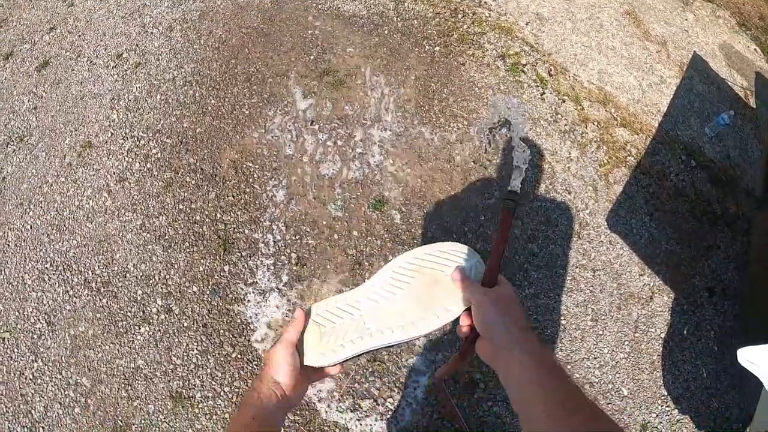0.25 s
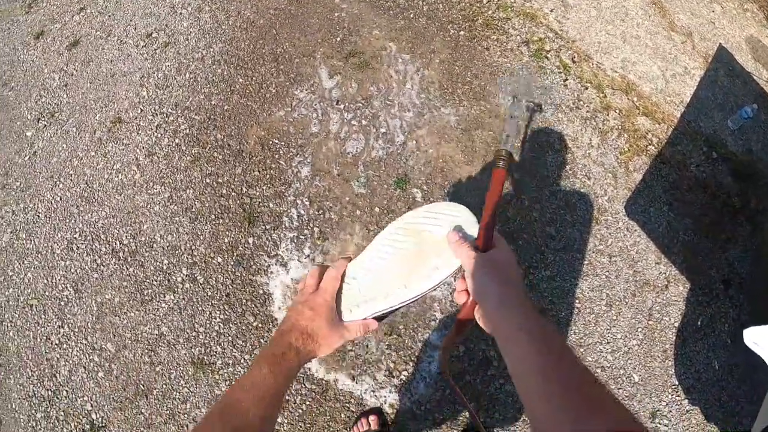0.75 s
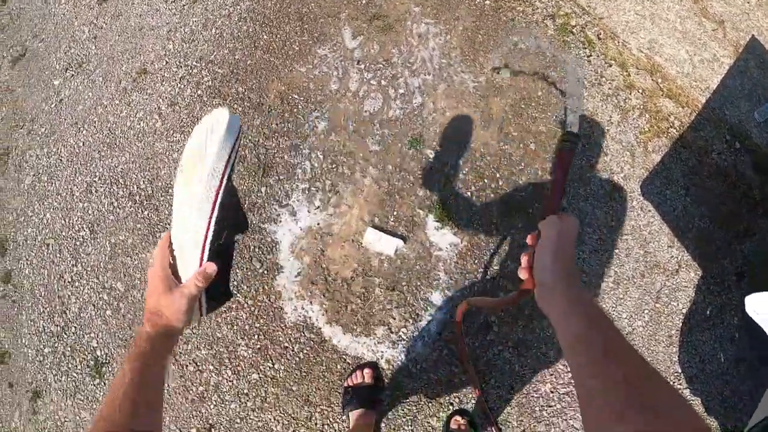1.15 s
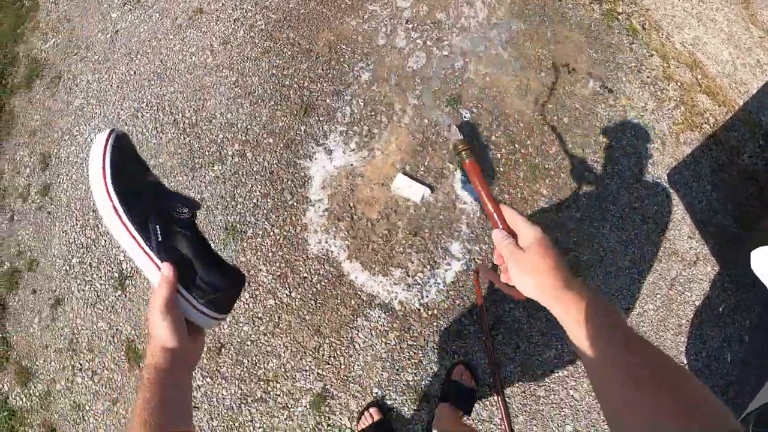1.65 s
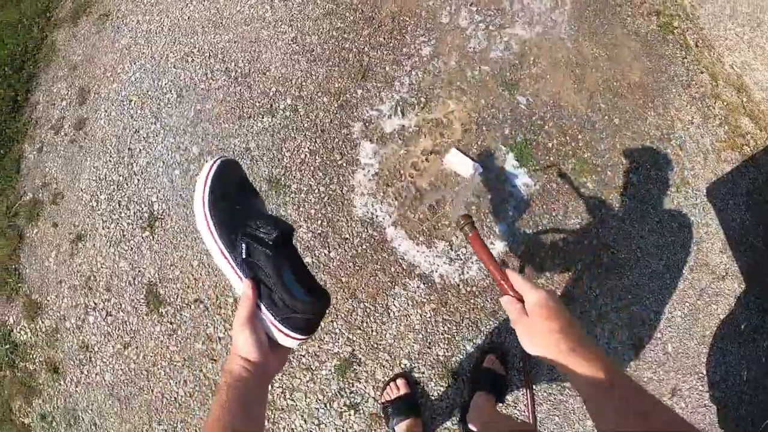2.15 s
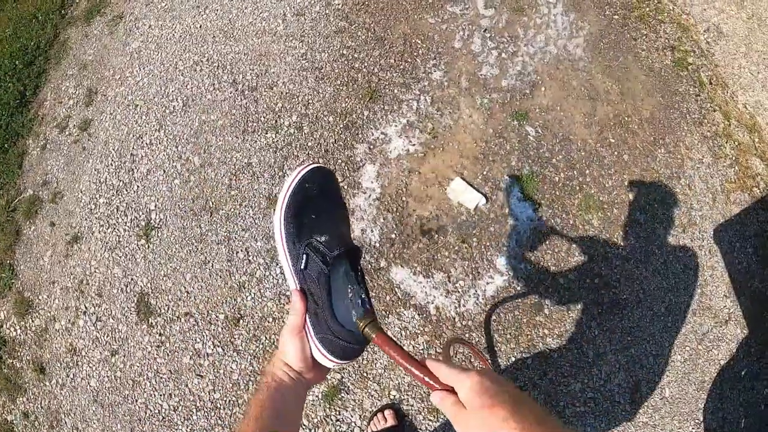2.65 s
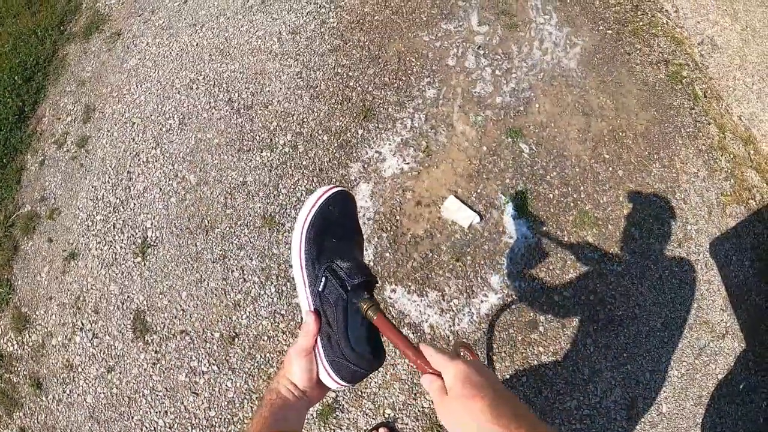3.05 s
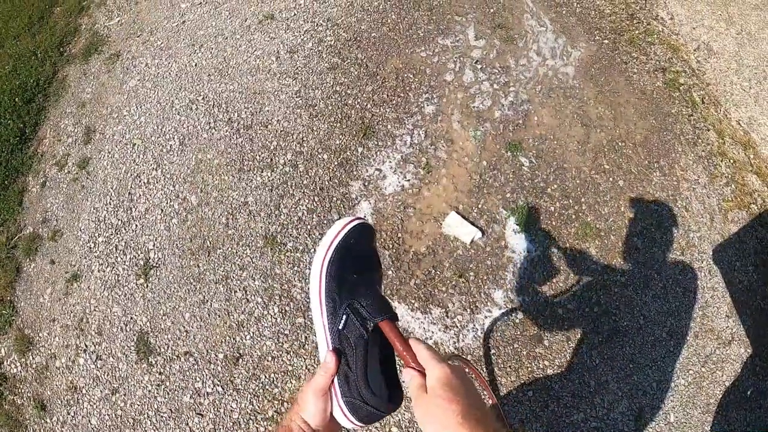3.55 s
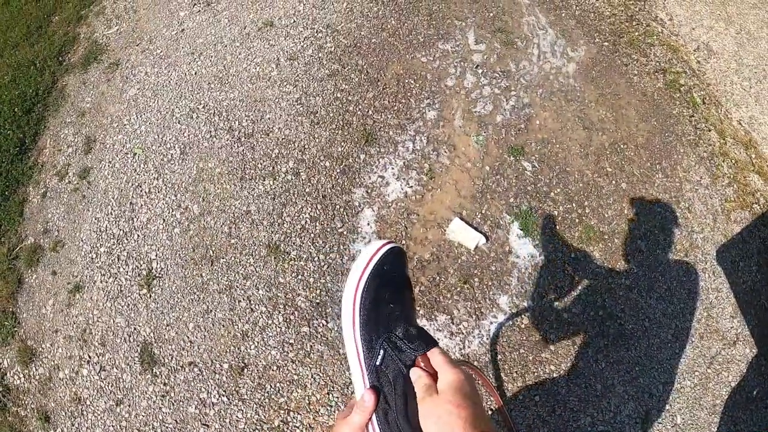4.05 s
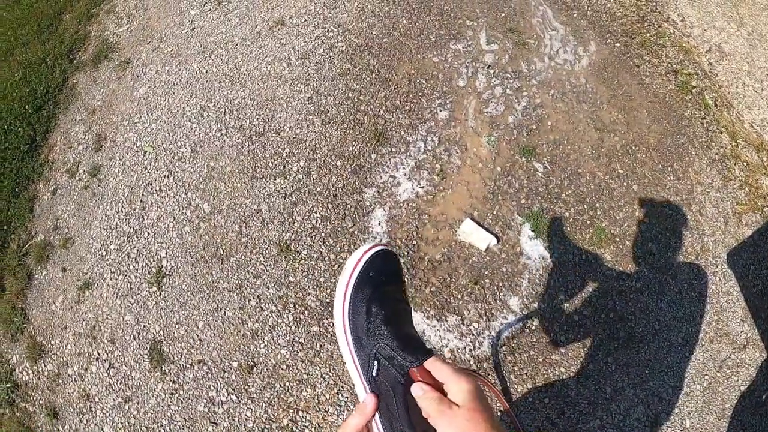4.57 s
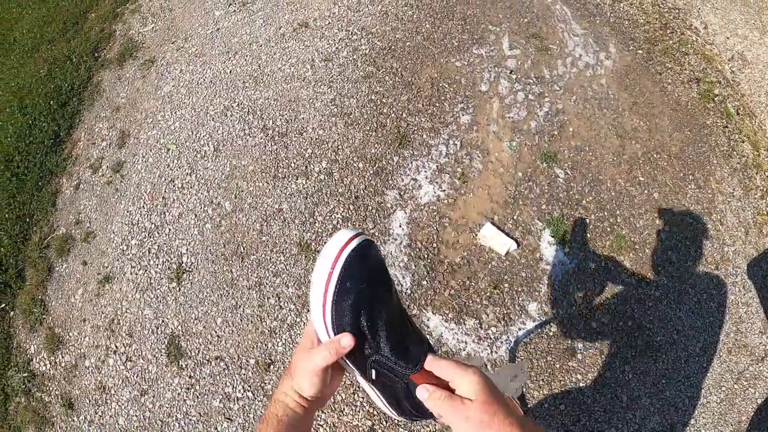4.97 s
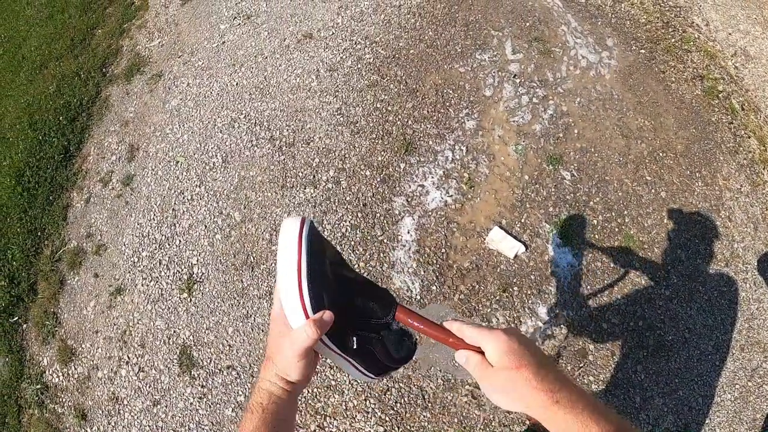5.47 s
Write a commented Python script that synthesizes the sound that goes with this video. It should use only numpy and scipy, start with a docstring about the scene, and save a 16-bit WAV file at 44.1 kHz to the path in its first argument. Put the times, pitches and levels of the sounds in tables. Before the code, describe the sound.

Water from a garden hose splatters unevenly on wet gravel, with sharp little slaps and fizzing drops. About halfway through, the stream goes into a canvas shoe and softens into a muffled, hollow gurgle with bubbles and froth. Near the end it spills out and splashes on the stones again. Wind buffets the close outdoor microphone, over a low hum and faint hiss.

```python
"""Garden hose on gravel and into a shoe

Outdoors, close to the water, on a stereo microphone with two ports. The broken stream splatters on
gravel, is turned into a canvas shoe, where bubbles ring the hollow in a muffled gurgle, and spills
out again. Wind buffets each port. A breathy whistle comes and goes; a low hum and a faint outdoor
hiss lie beneath."""
import sys
import numpy as np
from scipy import signal
from scipy.fft import rfft, irfft, next_fast_len
from scipy.io import wavfile
from scipy.ndimage import map_coordinates

SR = 44100
rng = np.random.default_rng(int(sys.argv[2]) if len(sys.argv) > 2 else 0)


def generate_wav(signal):
    """Clip the signal to [-1, 1] and save it as 16-bit WAV at the path in sys.argv[1]."""
    frames = np.transpose(np.atleast_2d(signal))
    scaled = np.clip(frames, -1, 1) * 32767
    pcm = np.round(scaled).astype(np.int16)
    wavfile.write(sys.argv[1], SR, pcm)


N = 251811

# deep and middle modes of the water-filled hollow: pitch_hz, width_hz, gain_db
DEEP_MODES = [(403, 190, -1), (591, 130, 2)]
MIDDLE_MODES = [(1105, 136, -2), (1303, 560, 2.7), (1680, 260, -3.5)]


def stream():
    """How hard the stream lands: level curves in dB of large drops, middling drops and fine spray."""
    # splatter on the gravel: time_s, middling_db, fine_db
    flow = [(0.0, -37.5, -46), (0.2, -33.5, -41.5), (0.46, -39, -51), (0.89, -37.5, -46.5),
            (1.27, -40, -52.5), (1.55, -39.5, -51), (1.7, -45.5, -51.5), (1.83, -39, -52.5),
            (1.92, -47.5, -55), (2.0, -36.5, -51), (2.16, -42, -47), (2.5, -45, -55), (2.56, -53, -60),
            (2.86, -53.5, -56), (2.97, -56, -60), (3.12, -55, -61), (3.17, -62, -73), (3.25, -42, -49),
            (3.32, -53, -64.5), (3.66, -61, -62.5), (3.95, -58.5, -64.5), (4.1, -61, -90), (4.34, -71, -71),
            (4.5, -56, -62), (4.66, -59, -61), (4.68, -47.5, -49), (4.85, -51.5, -54), (4.875, -57, -68),
            (4.9, -50.5, -50.5), (5.08, -45, -55), (5.12, -55, -64), (5.24, -48, -63), (5.27, -40, -51.5),
            (5.36, -38, -54), (5.45, -31.5, -44.5), (5.71, -43.5, -53.5)]
    middling_db, fine_db = curves(flow)
    return middling_db - 7, middling_db, fine_db


def clumps(decay_s=0.0025):
    """How thickly water lands: a steady share plus sudden, dying bursts."""
    decay = np.exp(-np.arange(0, 8 * decay_s, 1 / SR) / decay_s)
    return 1 + unit_rms(signal.oaconvolve(clicks(per_s=200, spread_db=3.4), decay)[:N])


def splatter():
    """The broken stream lands on the gravel in clumps of fizz and tiny ringing drops."""
    # spectrum of the spray: frequency_hz, density_db
    spectrum = [(500, -54), (850, -73), (1170, 5.5), (1650, 11), (2570, 13), (4250, -3), (4860, -1.5),
                (5770, -4.5), (6290, -10.5), (8980, -10.5), (12500, -26.5), (14700, -30), (16000, -55)]
    stream_db, thickness = stream(), clumps()
    # each band also has clumps of its own: small clumps fill only part of the range
    fizz = sum(band(rng.standard_normal(N) * (6 * thickness + clumps()), lo_hz, hi_hz)
               for lo_hz, hi_hz in [(700, 2200), (2200, 4200), (4200, 7500), (7500, 19000)])
    rings = [plink(hz, rng.uniform(2.4, 4.4), 0.043, 0.13) for hz in np.geomspace(950, 13000, 15)]
    drops = sum(signal.oaconvolve(clicks(40 * thickness, 4.8), ring / np.linalg.norm(ring))[:N]
                for ring in rings)
    drops = shaped(drops, np.sqrt)  # equal energy per octave becomes flat per Hz
    water = shaped(unit_rms(fizz) + 0.55 * unit_rms(drops), lambda hz: amp(db_at(spectrum, hz)))
    fine = shaped(water, lambda hz: 1 / (1 + (7000 / (hz + 1)) ** 6))
    large = shaped(water, lambda hz: 1 / (1 + (hz / 3500) ** 8))
    middling = water - large - fine
    surge = amp(1.5 * drift(13)[0])  # the flow pulses a little
    return surge * sum(amp(db) * unit_rms(x) for db, x in zip(stream_db, (large, middling, fine)))


def small_slugs(count=16, lo_hz=1470, hi_hz=4900):
    """Lesser slugs of water land at random, as loud as the splatter allows; rows for splats()."""
    when, size, pitch, crack, side = rng.random((count, 5)).T
    start_s = (np.arange(count) + when) / count * (N - 1) / SR
    level_db = stream()[1][(start_s * SR).astype(int)] + 12 + 17 * size ** 2
    ring_hz = lo_hz * (hi_hz / lo_hz) ** pitch
    return np.transpose([start_s, level_db, ring_hz, -30 + 18 * crack, 9 * (side - 0.5)])


def splats(slap_s=0.0012, lead_s=0.005, rebound_s=0.0033):
    """Slugs of water slap wet stones: a crack, two ringing air pockets, a rebound, fizz and a thud."""
    # the loudest slugs: start_s, level_db, ring_hz, crack_db, leftward_pan
    loud_slugs = [(0.1025, -25, 3570, -23, -5), (0.176, -14.5, 2770, -29, -3), (0.2433, -14, 3070, -3, 12),
                  (0.3511, -21, 3360, -17, 0), (0.4191, -2.5, 2140, -38, -0.5), (0.461, -12, 3120, -28, 0),
                  (0.5152, -1.5, 4140, -48, 2), (0.4835, -12, 4500, -15, 0), (0.557, -20, 2900, -25, 0),
                  (0.589, -19, 3200, -20, 0), (0.568, -22, 1360, -22, 4), (0.616, -6, 5250, -18, 7),
                  (0.6685, -15, 3530, -26, -2), (0.7285, -9.5, 3630, -32, -3), (0.741, -10.5, 2300, -11, 3),
                  (0.7589, -10.5, 2390, 2, -1), (0.8123, -5.5, 2720, -43, 2), (0.804, -17, 3300, -12, -2),
                  (0.841, -13.5, 2500, -18, 0), (0.8824, -18, 2000, -11, -2), (0.9076, -13, 4100, -28, -4),
                  (0.9383, -3.5, 2200, -41, 6), (0.9687, -19, 2250, -18, 0), (0.9876, -11, 4840, -17, 2),
                  (1.0001, -14, 2670, -13, 2), (1.0264, -8.5, 2700, -26, 2), (1.078, -21, 1600, -21, 5),
                  (1.1164, -18, 4400, -18, -1), (1.1293, -12, 4200, -25, -1), (1.1597, -12, 2230, -27, -1),
                  (1.1552, -5, 2140, -41, 2), (1.1995, -17, 2230, -27, 3), (1.2263, -4.5, 2170, -42, 0),
                  (1.2631, -5.5, 1840, -11, 0.5), (1.2953, -18, 1550, -31, -1), (1.3269, -10, 2780, -31, 1),
                  (1.3598, -11, 4730, -25, -2), (1.3794, -18.5, 1270, -18, 6), (1.3917, -12, 2340, -39, -3),
                  (1.4576, -19, 1300, -29, 3), (1.4854, -15, 2400, -23, 1), (1.5374, -13.5, 2400, -33, -3),
                  (1.6078, -19.5, 2470, -29, -7), (1.655, -13, 2620, -11, -3), (1.6813, -14, 1790, -31, 4),
                  (1.7273, -12, 3960, -27, -5), (1.8238, -17, 4360, -32, -12), (1.8814, -6, 1510, -48, -2),
                  (1.9728, -8, 3300, -23, -3), (1.868, -11, 1930, -12, 0), (1.9979, -19, 1410, -22, 9),
                  (2.009, -22, 1330, -20, 0), (2.0246, -8.5, 2190, -8, 4), (2.0842, -12.5, 3940, -15, 0),
                  (2.1093, -16, 2240, -22, 0), (2.1495, -8, 2980, -15, 2), (2.1714, -11.5, 2870, 6, 10),
                  (2.1842, -3.5, 3880, -10, -1), (2.2413, -10, 4100, -37, 0), (2.2681, -10.5, 2900, -5, -2),
                  (2.3532, -12, 1750, 13, 7), (2.4089, -16, 1680, 6, 4), (2.4671, -11.5, 2820, -24, -3.5),
                  (2.5012, -21, 3600, 3, 3), (2.5338, -10, 3250, -4.5, 4), (2.538, -5.5, 4560, -19, 3),
                  (2.5494, -35, 4500, -3, 3), (2.5845, -14.5, 1860, 12, -5), (2.6435, -13, 2740, -25, 2),
                  (2.6644, -26, 5500, -5, 5), (2.7137, -8.5, 3330, -38, 4), (2.7432, -19, 5060, -17, 6),
                  (2.7975, -21.5, 6000, -3, 0), (2.7576, -11, 2800, -5.5, 2), (2.8206, -24, 1160, 2, 1),
                  (2.8425, -18, 2750, -4, 3), (2.879, -24, 2730, -2, 1), (2.9091, -5.5, 3150, 3, 0),
                  (2.9791, -14, 1160, 7, -2), (3.0864, -21.5, 2900, -2, 5), (3.136, -9, 5550, -5, -1),
                  (3.1405, -13, 1150, -3, 0), (3.2406, -22, 2940, -8, -1), (3.4228, -14, 2940, -3, 4),
                  (3.4365, -19, 5500, -5, -1), (3.569, -24, 3220, 3, 8), (3.6132, -28, 2500, -21, 3),
                  (3.6666, -21, 2880, -15, -1), (3.714, -24, 1770, -13, 2), (4.0307, -19.5, 1370, -30, 2),
                  (4.2094, -33, 5920, 6, -4), (4.361, -17, 1730, -49, 4), (4.4675, -17, 4860, -20, -1),
                  (4.5292, -20, 1290, 15, -3), (4.6064, -22.5, 4470, 3, 1), (4.6881, -17.5, 1300, 7, -3),
                  (4.7077, -17, 2880, -15, -1), (4.7442, -13, 3570, -22, -1), (4.7676, -25, 5300, -3, -1),
                  (4.793, -18.5, 5160, -37, 2), (4.805, -12, 5050, -17, 2), (4.8194, -29, 5300, -3, -1),
                  (4.8537, -17, 3750, -24, -1), (4.8971, -12, 3120, -20, -2), (4.9222, -21, 3290, 2, -1),
                  (4.936, -20, 3100, -4, -1), (4.9568, -5, 3200, -25, 1), (4.975, -14, 2830, -21, -2),
                  (4.9801, -15, 3040, 2, 1), (5.0155, -17, 2900, -13, -1), (5.061, -22, 5300, -15, 2),
                  (5.0694, -13, 2750, -28, -1), (5.0918, -21, 5240, -7, 6), (5.2765, -13.5, 1280, -23, -3),
                  (5.3458, -9.5, 3120, -42, 0), (5.3851, -24, 2880, -28, 5), (5.4245, -14, 1090, -32, 0),
                  (5.4405, -12.5, 1720, -17, -3), (5.455, -6.5, 2940, -34, -3),
                  (5.4899, -8.5, 2800, -11, -6), (5.5621, -8.5, 2460, -37, -5), (5.578, -4, 2940, -34, 5),
                  (5.6192, -13, 2600, -30, -1), (5.653, -7, 2400, -33, 4), (5.694, -4.5, 2300, -4, -1)]
    slugs = np.vstack([loud_slugs, small_slugs()])
    out, t = np.zeros((2, N)), np.arange(2000) / SR
    noise, chances = rng.standard_normal((len(slugs), len(t))), rng.random((len(slugs), 2))
    thud = sum(amp(db) * np.sin(2 * np.pi * hz * t) * np.exp(-np.pi * width_hz * t)
               for hz, width_hz, db in DEEP_MODES + MIDDLE_MODES)
    leads = band(noise[:, ::-1] * (t < lead_s) * t / lead_s, 1850, 5500)
    bursts = noise * np.exp(-t / slap_s)
    cracks = band(band(bursts, 2530, 8400), 1060, 11700) + 0.85 * band(bursts, 5280, 5500)
    fizzes = band(noise * np.exp(-t / 0.059), 1600, 8000)
    for i, (start_s, db, hz, crack_db, pan) in enumerate(slugs):
        wait, pitch = chances[i]
        slap = 1.26 * band(bursts[i], 1.04 * hz, 1.06 * hz) + 0.59 * band(bursts[i], 0.48 * hz, 1.5 * hz)
        slap += amp(crack_db + 6) * cracks[i]
        add(slap, 0, 0.77 * plink(hz, 1.44, 0.0027, 0.24))
        add(slap, 0.00058 + 0.001245 * wait, 0.3 * plink(hz * (0.53 + 0.16 * pitch), 1.28, 0.05, 0.22))
        add(slap, rebound_s * (1 + pitch), amp(-13) * slap)  # thrown-up water falls back
        slap = band(slap, 780, 10500)  # the stones radiate little bass
        thud_db = -25 - 10.5 * np.log2(hz / 2000)  # lower, heavier slugs thud more in the hollow
        splat = slap / abs(slap).max() + amp(-32) * fizzes[i] + amp(thud_db) * thud
        gain = amp(db - 6) * amp([[0.13 * pan], [-0.6 * pan]])
        add(out, start_s + 0.0015, gain * splat)
        add(out, start_s + 0.001508 - lead_s, gain * amp(-13) * leads[i])  # the first drops run ahead
    return out


def churn(modes, bubble_gain):
    """Churning water and small bubbles excite the hollow's modes, which wander as the water moves."""
    turbulence = rng.standard_normal(N) * amp(4.3 * np.tanh(drift(25)[0]))
    wander = 1 + 0.052 * drift(7.9)[0]
    slosh = sum(amp(db) * unit_rms(resonate(turbulence, hz * wander, width_hz))
                for hz, width_hz, db in modes)
    bubbles = sum(amp(db) * signal.oaconvolve(clicks(25, 1.34), plink(hz * ratio, 3.65, 0.0022, 0.13))[:N]
                  for hz, _, db in modes for ratio in rng.uniform(0.86, 1.217, 3))
    return unit_rms(unit_rms(slosh) + bubble_gain * unit_rms(bubbles))


def gurgle():
    """Water sloshes in the hollow of shoe and puddle."""
    # strength of the sloshing: time_s, deep_db, middle_db
    levels = [(0.0, -60, -55), (0.32, -54.5, -46), (0.57, -62, -55), (0.78, -59, -47.5), (1.02, -53, -49.5),
              (1.16, -66, -46.5), (1.61, -60, -53.5), (1.88, -61, -47), (2.02, -58, -46), (2.18, -53, -51),
              (2.51, -60, -54), (2.83, -62, -59), (3.07, -53.5, -56.5), (3.34, -55.5, -49.5),
              (3.55, -56, -47), (3.75, -81, -56.5), (3.96, -46.5, -42.5), (4.13, -52, -56),
              (4.36, -57.5, -47), (4.6, -55, -54.5), (4.8, -54.5, -47), (4.93, -65, -51.5),
              (5.02, -50, -42.5), (5.1, -52, -48.5), (5.2, -49.5, -42.5), (5.34, -49.5, -43),
              (5.71, -57.5, -42.5)]
    deep_db, middle_db = curves(levels)
    return amp(deep_db) * churn(DEEP_MODES, 3.3) + amp(middle_db) * churn(MIDDLE_MODES, 1.28)


def froth():
    """Froth comes and goes on the water in the shoe and rings the high modes."""
    # strength of the froth: time_s, level_db
    levels = [(2.95, -72), (3.05, -68), (3.12, -47), (3.19, -61), (3.25, -50), (3.3, -57), (3.4, -46),
              (3.5, -55), (3.58, -51), (3.64, -66), (3.68, -49), (3.76, -65), (3.95, -47), (4.07, -52),
              (4.15, -79), (4.3, -54.5), (4.66, -64), (4.685, -44), (4.77, -46), (4.84, -48), (4.875, -62),
              (4.9, -45), (5.0, -46), (5.09, -48), (5.12, -54), (5.25, -48), (5.45, -39.5), (5.7, -40)]
    # high modes of the hollow: pitch_hz, width_hz, gain_db
    shallow_modes = [(2790, 390, 2), (3310, 590, -4.5), (4500, 780, -12.5), (5170, 600, -8),
                     (7300, 1800, -12.5)]
    level_db = curves(levels)[0] + 4 * drift(5.2)[0]
    return during(levels) * amp(level_db) * churn(shallow_modes, 1.2)


def glugs():
    """Each larger bubble rings with three quieter neighbours just behind it."""
    # the larger bubbles: start_s, peak_db, pitch_hz
    bubbles = [(0.821, -37, 600), (2.788, -40, 1060), (2.878, -39.5, 1004), (2.955, -35.5, 1040),
               (2.979, -39, 494), (2.9794, -29.5, 2840), (3.04, -51, 596), (3.071, -32, 3150),
               (3.105, -37, 587), (3.133, -33.5, 3160), (3.139, -32.5, 1122), (3.263, -33.5, 1090),
               (3.323, -30.5, 1260), (3.345, -34.5, 1120), (3.351, -33, 3360), (3.3924, -39, 3080),
               (3.42, -38, 2700), (3.474, -34.5, 638), (3.567, -33.5, 1070), (3.587, -39, 1080),
               (3.664, -33.5, 2980), (3.674, -33, 2950), (3.612, -39.5, 2400), (3.715, -39, 1800),
               (3.748, -42, 1650), (3.53, -40, 3420), (3.31, -42, 3200), (3.305, -38.5, 984),
               (3.385, -39, 1250), (3.085, -36, 1100), (3.165, -44, 560), (3.2, -45, 570),
               (3.67, -29, 1080), (3.668, -33, 645), (3.675, -38, 705), (3.716, -32, 1035),
               (3.722, -36.5, 650), (3.03, -43, 4400), (3.557, -45, 4330), (3.586, -39, 3450),
               (5.023, -31.5, 1580), (5.195, -37, 1190), (3.685, -36, 1075), (3.714, -32.5, 655),
               (3.776, -35, 674), (3.79, -35, 647), (4.623, -38.5, 1800), (2.995, -35.5, 1135),
               (3.191, -40, 1090), (3.277, -34, 1340), (3.817, -35.5, 1036), (3.842, -40, 620),
               (3.52, -42, 640), (3.63, -44, 654), (3.9, -42, 665), (4.03, -36, 674), (0.86, -41, 540),
               (3.96, -33, 680), (3.983, -30.5, 440), (4.02, -36, 1360), (4.36, -33, 560),
               (4.383, -37, 1350), (4.474, -35, 1090), (4.582, -39.5, 524), (4.64, -44, 525),
               (4.75, -42, 545), (5.05, -34.5, 414), (5.31, -34.5, 503), (5.51, -35, 454),
               (4.679, -35, 1300), (4.829, -37, 1050), (5.011, -38, 450), (5.138, -32, 1040),
               (5.174, -29.5, 1215), (5.229, -26.5, 1216), (5.281, -36, 1300), (3.374, -46, 1310),
               (3.41, -38, 1240), (3.438, -36, 3390), (3.05, -44, 2950), (3.89, -42, 2730),
               (3.96, -47, 2730), (3.36, -41, 6850), (3.517, -40, 7000), (5.491, -28, 1244),
               (5.521, -27, 1080), (5.669, -32, 1260)]
    out = np.zeros(N)
    for start_s, db, hz in bubbles:
        t60_s = 0.043 * (1000 / hz) ** 0.39  # higher bubbles die sooner
        cycles = t60_s * hz / np.log(1000)
        add(out, start_s, amp(db) * plink(hz, 0.8 * cycles, 0.006, 0.35))
        for wait, pitch in rng.random((3, 2)):
            neighbour = plink(hz * (0.62 + 0.8 * pitch), 0.83 * cycles, 0.015, 0.24)
            add(out, start_s + 0.014 * wait, amp(db - 11) * neighbour)
    return out


def whistles():
    """Noise through narrow moving resonances makes two breathy tones."""
    # a whistle, perhaps the mouth of the hose: time_s, level_db, pitch_hz
    whistle = [(1.3, -96, 1890), (1.6, -61, 1740), (1.85, -41, 1800), (2.0, -47.5, 1820), (2.2, -66, 1760),
               (2.4, -45, 1720), (2.7, -51.5, 1720), (2.95, -68, 1680), (3.3, -58.5, 1820),
               (3.75, -59, 1730), (3.9, -48.5, 1750), (4.1, -53, 1770), (4.3, -53.5, 1730),
               (4.7, -62, 1770)]
    # a faint falling tone: time_s, level_db, pitch_hz
    falling_tone = [(4.13, -87, 2480), (4.17, -53, 2480), (4.25, -57, 2470), (4.33, -62, 2170),
                    (4.37, -94, 2150)]
    out = np.zeros(N)
    sway, flutter = drift(3.9, count=2)
    for rows, width_hz in ((whistle, 230), (falling_tone, 190)):
        level_db, hz = curves(rows)
        tone = unit_rms(resonate(rng.standard_normal(N), hz * (1 + 0.031 * sway), width_hz))
        out += during(rows) * amp(level_db + 3.1 * flutter) * tone
    return out


def ports(water, lag_s=4.4e-5, scatter_s=2.2e-5):
    """The left port hears the water later, with less treble; lag and balance vary as the drops land."""
    # shading of the left port: frequency_hz, left_minus_right_db
    shade = [(60, 4), (120, -6), (240, -3), (480, -1), (950, -1.5), (1890, 0), (3770, 0), (7520, -4),
             (15000, -9.5)]
    bearing, balance = drift(144, count=2)
    late = map_coordinates(water[0], [np.arange(N) - (lag_s + scatter_s * bearing) * SR], order=3)
    left = shaped(late * amp(2.92 * balance), lambda hz: amp(db_at(shade, hz) / 2))
    right = shaped(water[1] / amp(0.14 * balance), lambda hz: amp(-db_at(shade, hz) / 2))
    return np.array([left, right])


def gusts(breeze_db=-36.5, rise_s=0.022, fall_s=0.064):
    """Strength of rumble and upper bass at each port: a breeze plus gusts that rise, hold and fall."""
    # gusts over the breeze: start_s, hold_s, level_db, left_minus_right_db, upper_bass_relative_db
    blows = [(0.0, 0.2, -39.5, -10, -28), (0.701, 0.22, -41, 1, -4.5), (1.114, 0.01, -31, 5, -12),
             (1.238, 0.066, -19, 5.5, -21), (1.356, 0.028, -27.5, -4.5, -4), (1.435, 0.026, -25.5, 1, -14),
             (1.75, 0.076, -20, -2.5, -20), (1.91, 0.15, -22.5, -2.5, -15.5), (2.165, 0.13, -27, 9, -9.5),
             (2.391, 0.16, -28, 3.5, -13.5), (2.646, 0.031, -31, 11, -15), (2.763, 0.079, -27.5, 7, -11.5),
             (2.955, 0.15, -24.5, 5, -13.5), (3.195, 0.2, -28.5, 7, -21), (3.461, 0.041, -22.5, -3, -20),
             (3.558, 0.35, -33, 3.5, -38), (3.874, 0.029, -24, 1, -15), (3.978, 0.069, -25, 6.5, -16.5),
             (4.103, 0.033, -26, -4.5, -4), (4.205, 0.25, -27.5, -4, -11), (4.37, 0.15, -30.5, 6.5, -4.5),
             (4.539, 0.019, -26.5, 13, -7.5), (4.774, 0.013, -30.5, 21, -17),
             (5.058, 0.026, -31.5, 16.5, -19), (5.282, 0.037, -29.5, 11, -12), (5.538, 0.08, -23, 0.5, -34)]
    t = np.arange(0, N / SR, 0.002)
    power = amp([[[breeze_db]], [[breeze_db - 19]]]) ** 2  # axes: layer, port, time
    for start_s, hold_s, db, pan_db, upper_db in blows:
        end_s = start_s + hold_s
        envelope = np.interp(t, [start_s - rise_s, start_s, end_s, end_s + fall_s], [0, 1, 1, 0])
        power = power + (amp([[[db]], [[db + upper_db]]]) * panned(pan_db) * envelope) ** 2
    return np.array([[np.interp(np.arange(N) / SR, t, port) for port in layer]
                     for layer in np.sqrt(power)])


def wind():
    """Lumpy eddies roll past each port on their own; the small sharp ones often strike both."""
    # spectrum of the rumble: frequency_hz, density_db
    spectrum = [(8.8, -16), (15, -0.5), (32, 6), (62, 8), (102, -0.5), (140, -8), (180, -17.5), (310, -120)]
    # single hard eddies: start_s, peak_db, pitch_hz, left_minus_right_db
    thumps = [(1.132, -22.5, 135, 20), (1.253, -22, 131, 8), (1.432, -20.5, 164, -9),
              (1.76, -30.5, 156, -21), (1.892, -35.5, 150, -32), (2.181, -22, 146, 4),
              (2.446, -30.5, 175, 12), (2.757, -28, 135, 14), (2.947, -22.5, 155, 10),
              (3.07, -23.5, 176, 8), (3.14, -21, 173, 9), (3.458, -26.5, 156, 16), (3.865, -31, 240, -33.5),
              (3.979, -19, 187, -12), (4.108, -22, 124, -13), (4.309, -22.5, 155, -10),
              (4.214, -24.5, 106, -11), (4.334, -21, 75.5, -6), (4.386, -16, 82, 0),
              (4.431, -15.5, 121, -9), (4.4348, -22, 298, -7), (4.47, -25, 70, 5), (4.53, -22, 210, -14),
              (4.543, -17, 89, 13), (4.783, -26, 170, -12), (5.293, -47, 133, 2), (5.625, -27.5, 155, 11)]
    rumble_gain, upper_gain = gusts()
    lumps = amp(2.25 * np.tanh(drift(37, count=2)))
    rumble = shaped(rng.standard_normal((2, N)), lambda hz: amp(db_at(spectrum, hz))) * lumps
    common, right_only = rng.standard_normal((2, N)) * amp(5.6 * np.tanh(drift(32)))
    eddies = np.array([common, 0.8 * common + 1.95 * right_only])
    upper_bass = shaped(eddies, lambda hz: (hz > 110) / (1 + (hz / 190) ** 3.6))
    out = rumble_gain * unit_rms(rumble) + upper_gain * unit_rms(upper_bass)
    for start_s, db, hz, pan_db in thumps:
        add(out, start_s, amp(db) * panned(pan_db) * plink(hz, cycles=0.56, glide=-0.054, onset=0.93))
    return out


def hum(pitch_hz=107.2, level_db=-39):
    """A steady low tone that wavers a little."""
    wander, swell = drift(2.53, count=2)
    return amp(level_db + 0.5 * swell) * np.sin(2 * np.pi * np.cumsum(pitch_hz + 0.5 * wander) / SR)


def air(rms_db=-56):
    """Faint banded outdoor hiss, mostly common to both ports."""
    # spectrum of the background: frequency_hz, density_db
    spectrum = [(120, -30), (200, 22), (330, 18.5), (500, 1), (800, -17), (2000, -30), (3900, 7.5),
                (4800, -20), (5500, 1), (6100, 8), (6600, -30), (9000, -19), (16000, -35)]
    common, right_only = rng.standard_normal((2, N))
    noise = np.array([common, 0.76 * common + 0.12 * right_only])
    return amp(rms_db) * unit_rms(shaped(noise, lambda hz: amp(db_at(spectrum, hz))))


def plink(hz, cycles, glide, onset):
    """A damped ring of peak 1; a positive glide lifts its pitch, like a bubble nearing the surface."""
    age = np.arange(int(6 * cycles * SR / hz) + 8) * hz / (cycles * SR)  # in decay times
    envelope = (1 - np.exp(-age / onset)) ** 2 * np.exp(-age)
    ring = envelope * np.sin(2 * np.pi * cycles * age * (1 + glide * age))
    return ring / abs(ring).max()


def resonate(x, hz, width_hz):
    """A moving resonance: shifts the curve hz down to zero, smooths twice and shifts back."""
    carrier = np.exp(2j * np.pi * np.cumsum(hz) / SR)
    pole = np.exp(-np.pi * width_hz / SR)
    return (carrier * signal.lfilter([1], [1, -2 * pole, pole * pole], x / carrier)).real


def clicks(per_s, spread_db):
    """Random clicks, many small and a few large."""
    return amp(spread_db * np.minimum(rng.exponential(1, N), 4.5)) * (rng.random(N) < per_s / SR)


def drift(rate_hz, count=1):
    """Rows of smooth random wander, rms 1."""
    return unit_rms(shaped(rng.standard_normal((count, N)), lambda hz: 1 / (1 + (hz / rate_hz) ** 2)))


def shaped(x, gain):
    """Filters x by a gain given as a function of Hz."""
    size = next_fast_len(N)
    return irfft(rfft(x, size) * gain(np.fft.rfftfreq(size, 1 / SR)), size)[..., :N]


def band(x, lo_hz, hi_hz):
    return signal.lfilter(*signal.butter(2, [lo_hz, min(hi_hz, 0.45 * SR)], "band", fs=SR), x)


def db_at(spectrum, hz):
    points_hz, db = np.transpose(spectrum)
    return np.interp(np.log(hz + 1), np.log(points_hz + 1), db)


def curves(rows):
    time_s, *columns = np.transpose(rows)
    return [np.interp(np.arange(N) / SR, time_s, column) for column in columns]


def during(rows):
    t = np.arange(N) / SR
    return (t > rows[0][0]) & (t < rows[-1][0])


def add(mix, start_s, sound):
    part = mix[..., max(round(start_s * SR), 0):][..., :sound.shape[-1]]
    part += sound[..., :part.shape[-1]]


def amp(db):
    return 10 ** (np.asarray(db) / 20)


def panned(pan_db):
    return amp([[pan_db / 2], [-pan_db / 2]])


def unit_rms(x):
    return x / np.sqrt(np.mean(x ** 2) + 1e-20)


def scene():
    """The water as it reaches the two ports, with wind, hum and hiss."""
    water = splatter() + gurgle() + froth() + glugs() + whistles() + splats()
    return ports(water) + wind() + hum() + air()


def record(dry):
    """The treble is cut off at 16 kHz."""
    lowpass = signal.firwin(511, 16000, window=("kaiser", 9), fs=SR)
    return signal.oaconvolve(dry, lowpass[None], "same")


dry = scene()
out = record(dry)
generate_wav(out)
```